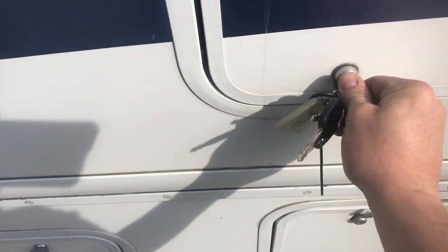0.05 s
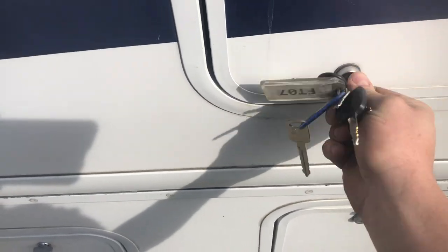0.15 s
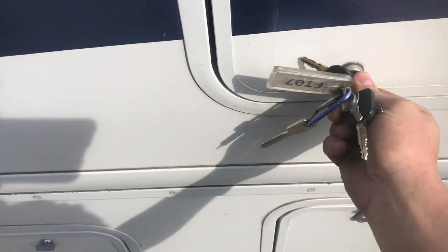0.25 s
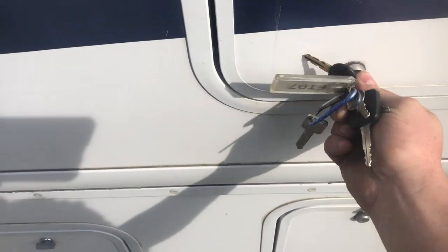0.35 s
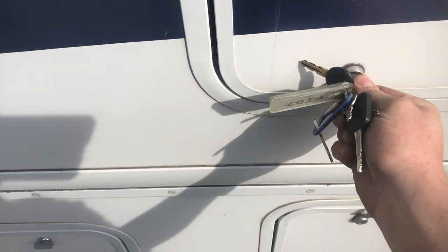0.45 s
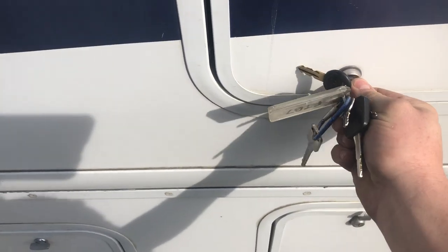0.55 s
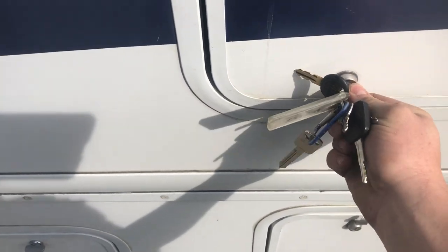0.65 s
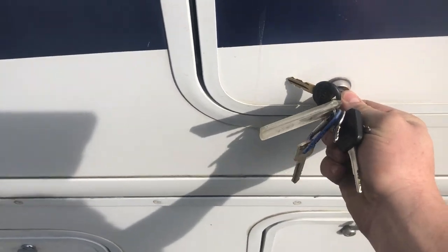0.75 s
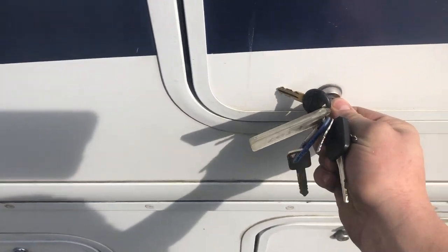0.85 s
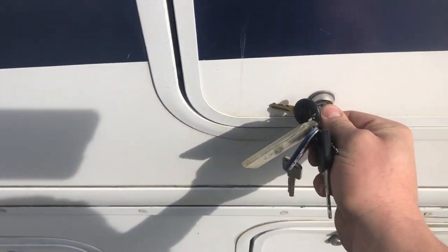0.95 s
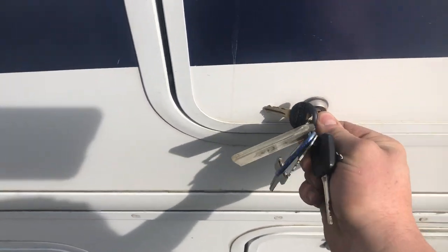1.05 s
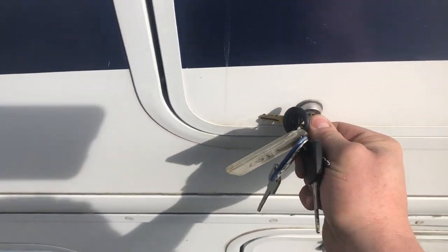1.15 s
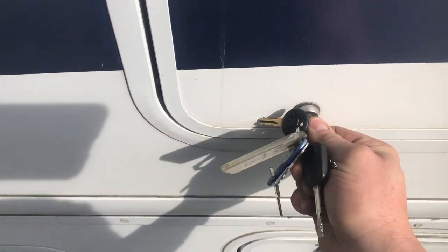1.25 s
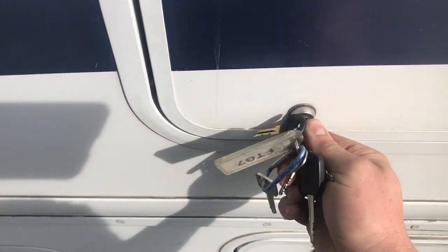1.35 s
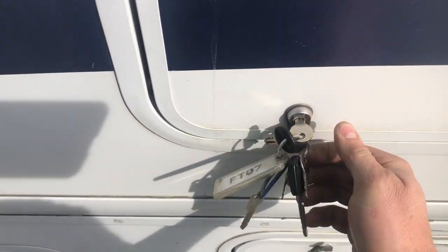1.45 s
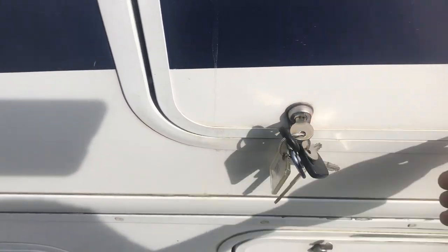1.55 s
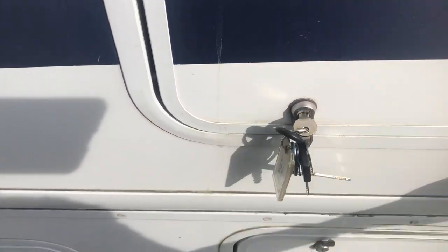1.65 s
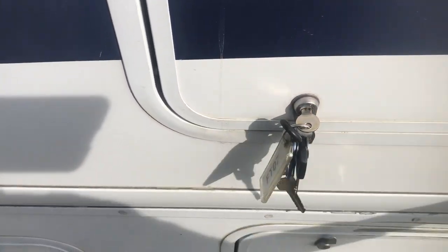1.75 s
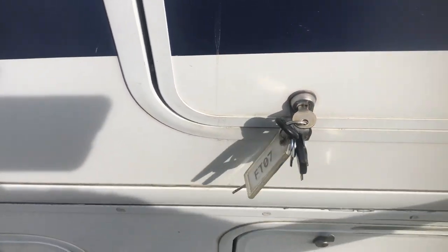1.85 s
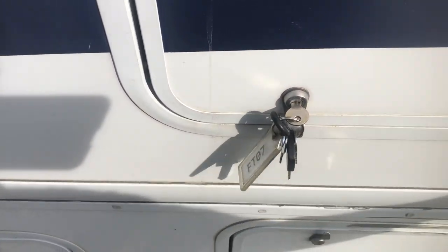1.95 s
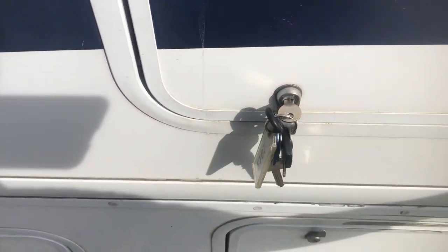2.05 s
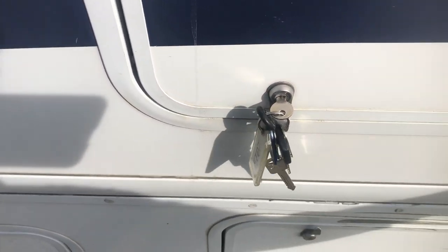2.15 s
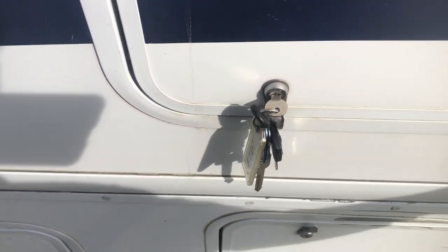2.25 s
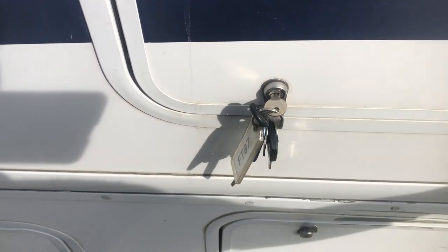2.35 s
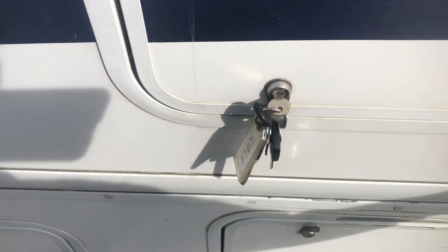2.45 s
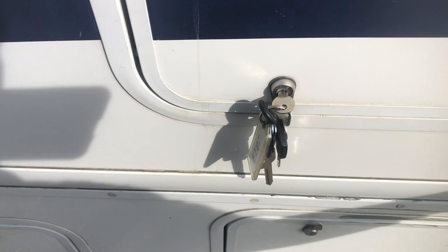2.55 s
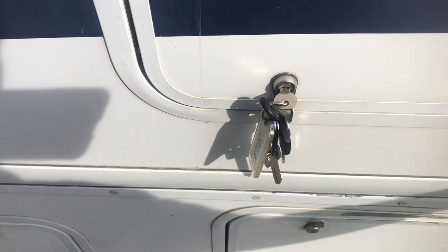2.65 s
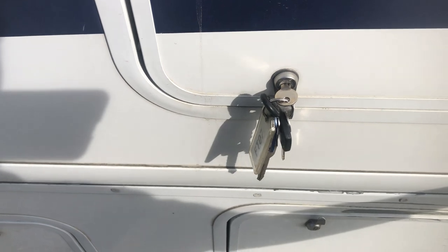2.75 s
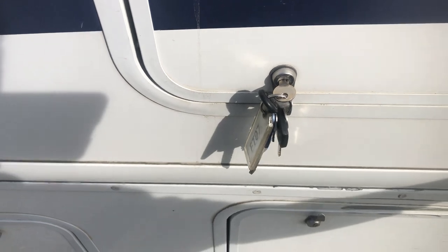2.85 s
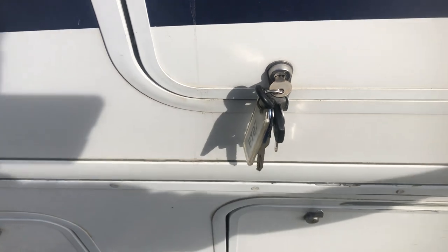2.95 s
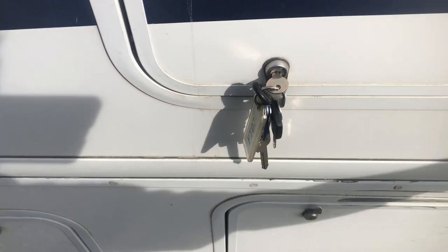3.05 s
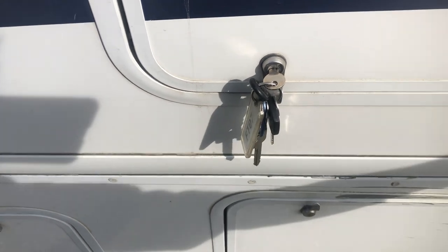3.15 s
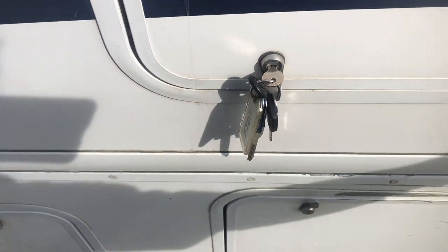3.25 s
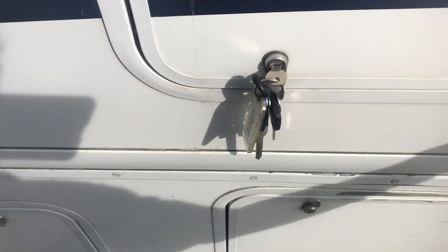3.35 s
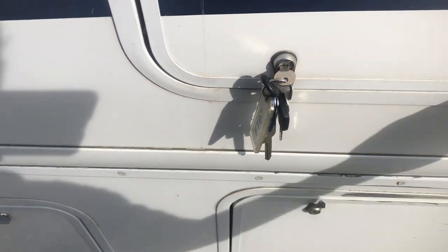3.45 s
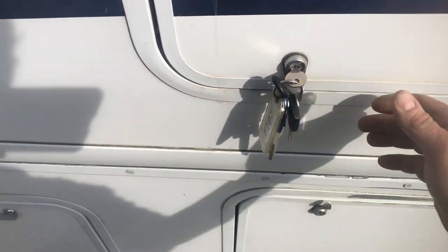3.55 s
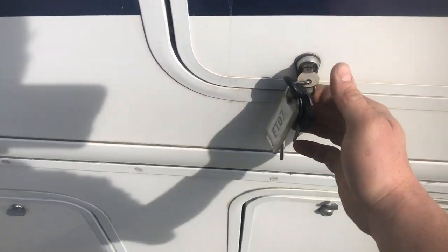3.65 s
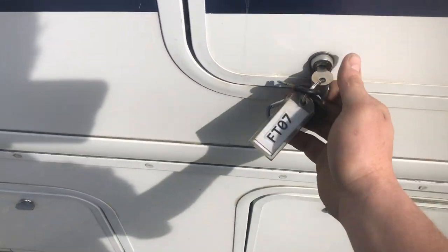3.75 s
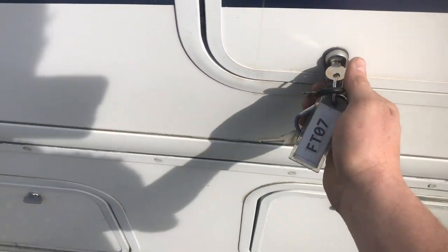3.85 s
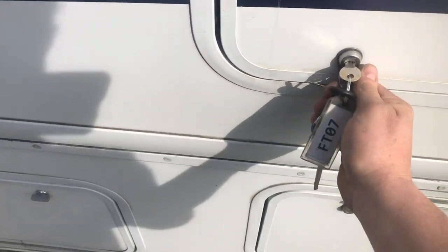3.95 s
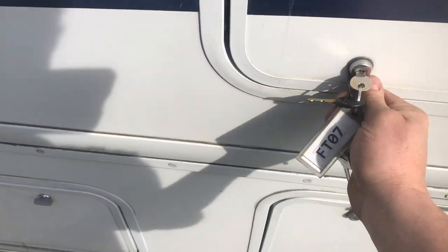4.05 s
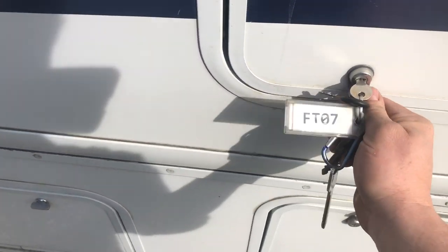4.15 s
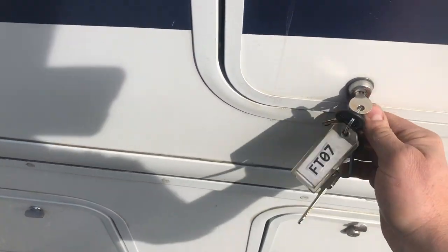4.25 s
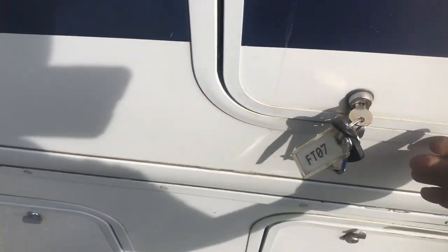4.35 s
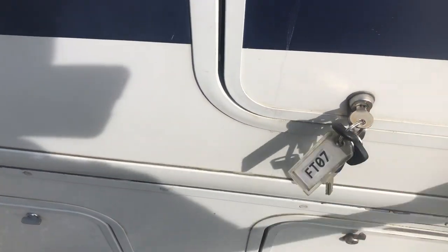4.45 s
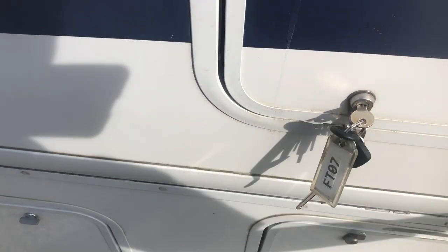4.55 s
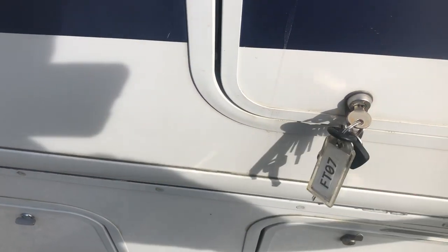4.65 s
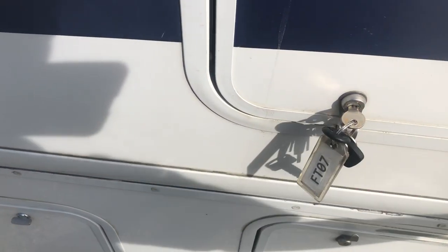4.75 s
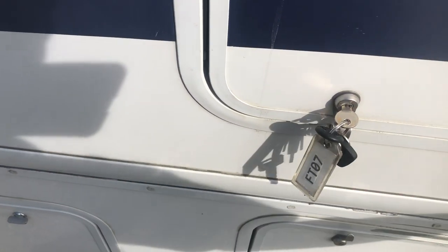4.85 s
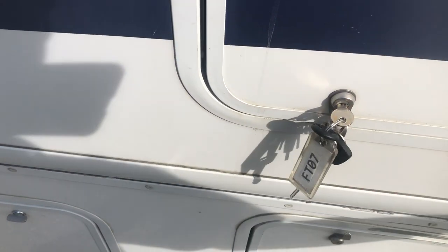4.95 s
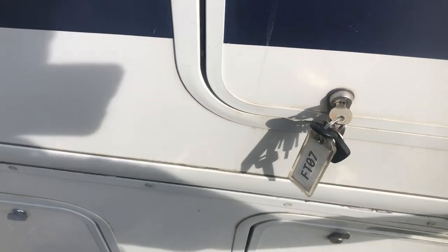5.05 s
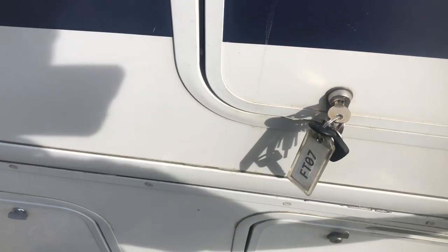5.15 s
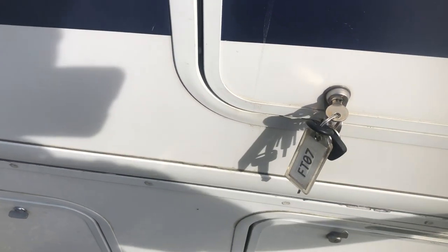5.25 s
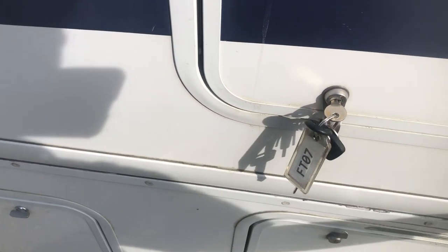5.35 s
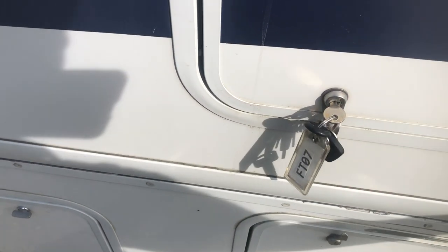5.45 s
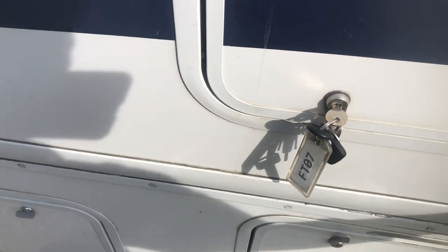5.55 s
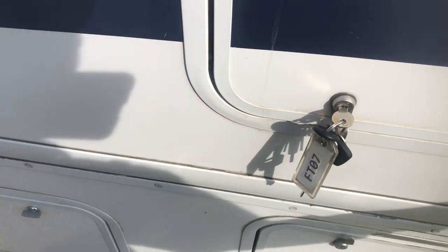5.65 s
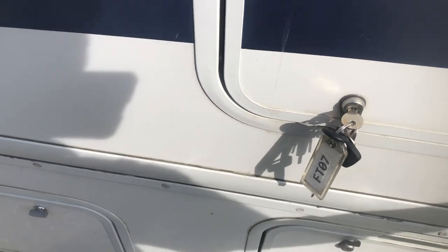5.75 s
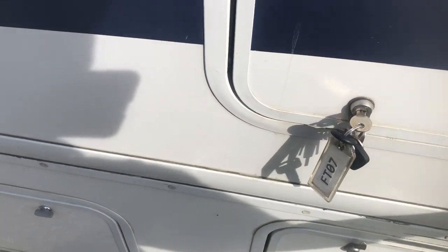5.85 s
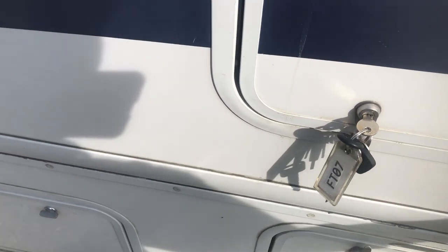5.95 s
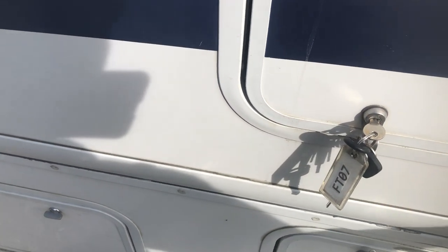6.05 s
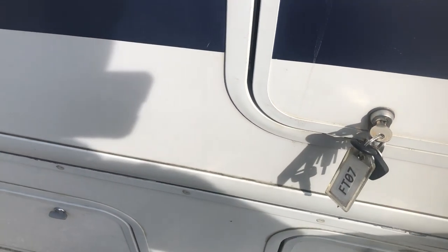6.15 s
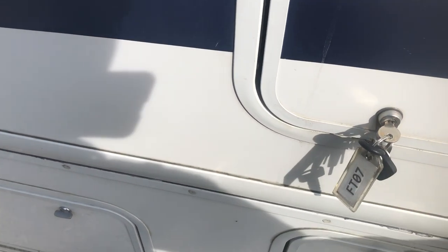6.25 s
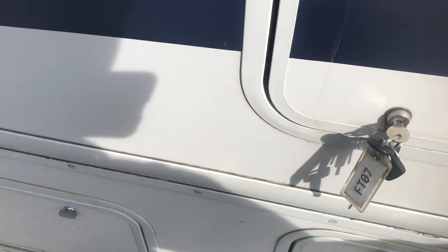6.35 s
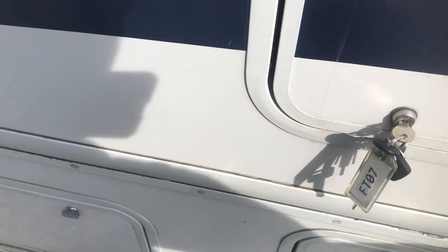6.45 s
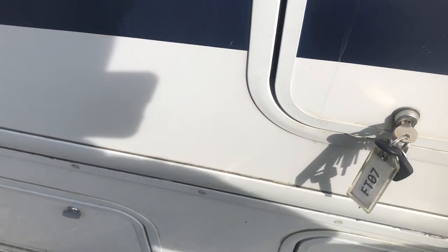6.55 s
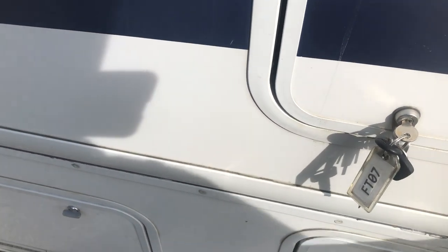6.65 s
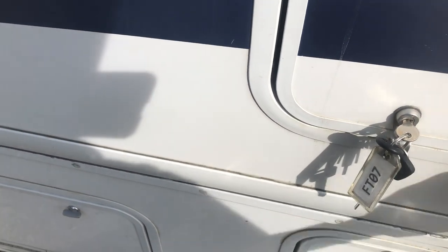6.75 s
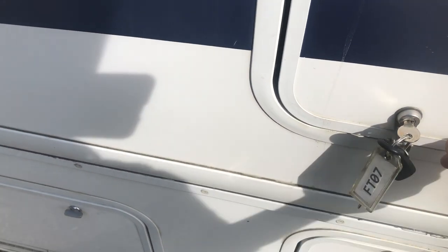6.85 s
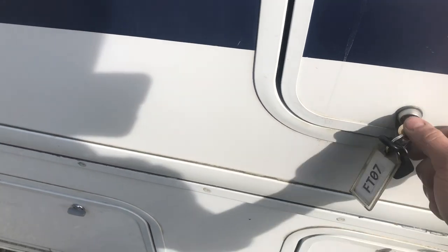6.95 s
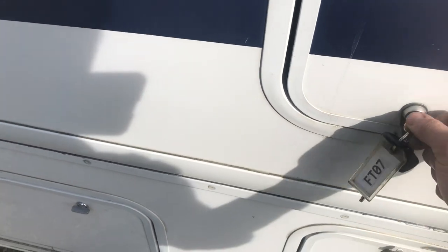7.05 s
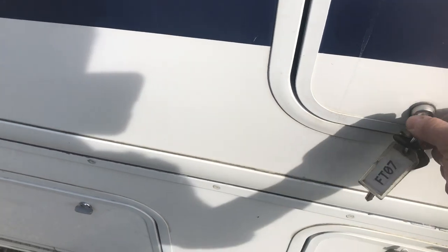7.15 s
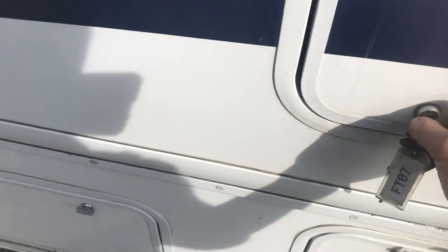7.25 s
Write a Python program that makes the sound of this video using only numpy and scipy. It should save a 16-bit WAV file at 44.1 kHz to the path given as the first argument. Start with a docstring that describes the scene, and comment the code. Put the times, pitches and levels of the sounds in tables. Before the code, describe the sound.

Keys rattle in short bursts against a light hollow door, with sharp metal snaps, knocks, brief scrapes and quiet traffic noise behind.

```python
"""A bunch of keys is worked in the lock of a thin compartment door, outdoors, over traffic wash and hiss.
Keys click and knock for half a second, touch lightly, then burst into clatter at 1.4-1.9 s: metal snaps,
key modes ring, the struck door skin knocks and the whole panel booms. A hard knock at 2.45 s leads into
faint slides; dense jingling and ringing at 3.7-4.8 s; a blow at 5.06 s, then slides scrape, made of
filtered grains of noise. A last light clicking and knocking comes at 6.9-7.3 s."""
import sys
import numpy as np
from scipy import signal
from scipy.fft import rfft, irfft, next_fast_len
from scipy.io import wavfile
from scipy.ndimage import uniform_filter1d

SR = 44100
rng = np.random.default_rng(int(sys.argv[2]) if len(sys.argv) > 2 else 0)


def to_wav(sig):
    """Store sig (one row per channel, or 1-D mono) as 16-bit WAV at the path in sys.argv[1].

    Samples outside -1..1 are clipped; the rate is SR.
    """
    pcm = np.clip(np.atleast_2d(sig), -1, 1) * 32767
    pcm = np.round(pcm).astype(np.int16)
    wavfile.write(sys.argv[1], SR, pcm.T)  # frames by channels


N = 322371


def gain_of(db):
    """dB to gain."""
    return 10 ** (np.asarray(db) / 20)


def evened(x):
    """Sets rms 1."""
    return x / np.sqrt(np.mean(x ** 2) + 1e-20)


def smoothed_twice(x, first, second, axis=-1):
    """Two running means, lengths in samples."""
    return uniform_filter1d(uniform_filter1d(x, size=first, axis=axis), size=second, axis=axis)


def read(points, hz):
    """Reads a spectrum in dB on a log-frequency axis."""
    point_hz, db = np.transpose(points)
    return np.interp(np.log(hz + 1), np.log(point_hz + 1), db)


def add(mix, start_s, sound):
    """Mixes a sound in at start_s, in place."""
    part = mix[round(start_s * SR):][:len(sound)]
    part += sound[:len(part)]


def coloured(x, db_at):
    """Filters by a spectrum in dB, a function of Hz, and sets rms 1."""
    hz = np.fft.rfftfreq(len(x), 1 / SR)
    return evened(irfft(rfft(x) * gain_of(db_at(hz)), len(x)))


# Smooth treble spectrum. Each row: frequency in Hz, relative density in dB per Hz.
HISS_SPECTRUM = [(1470, -34.5), (2500, -16), (3040, -10), (3440, -11.5), (4550, -12), (5190, -17),
                 (16000, -22.5)]
HISS_RMS_DB = -76.5


def hiss():
    """Smooth steady hiss in the treble."""
    return gain_of(HISS_RMS_DB) * coloured(rng.standard_normal(N), lambda hz: read(HISS_SPECTRUM, hz))


# Distant traffic spectrum. Each row: frequency in Hz, relative density in dB per Hz.
WASH_SPECTRUM = [(24, -36), (40, 2), (81, -12), (118, -0.5), (147, -4), (493, -20), (802, -8), (944, -11.5),
                 (1030, -6.5), (1190, -14.5), (1310, -11.5), (2290, -24.5), (3000, -43.5), (3900, -70),
                 (6600, -120)]
# Distant traffic swells. Each row: time in seconds, level in dB.
WASH_SWELLS = [(0.0, -51), (0.65, -49.5), (1.44, -48.5), (1.67, -52), (1.97, -47.5), (3.54, -54),
               (3.7, -54.5), (3.87, -53), (4.3, -53), (4.56, -54), (6.31, -51.5), (6.43, -49.5),
               (6.78, -52.5), (7.31, -53.5)]


def wash():
    """Traffic: random short-time spectra with drifting patches; the bass is lumpy with wind."""
    frames, hz = N // 256 + 5, np.fft.rfftfreq(1024, 1 / SR)[:, None]
    real, imag, patches = rng.standard_normal((frames, 513, 3)).T
    patches = uniform_filter1d(uniform_filter1d(patches, size=10, axis=0), size=14, axis=1)
    gusts = evened(uniform_filter1d(rng.standard_normal(frames), size=8))
    gust_db = 2.0 * gusts / (1 + (hz / 300) ** 2)
    frame_db = read(WASH_SPECTRUM, hz) + 2.3 * evened(patches) + gust_db
    spectra = (real + 1j * imag) * gain_of(frame_db)
    noise = evened(signal.istft(spectra, nperseg=1024, noverlap=768)[1][:N])
    swell_s, swell_db = np.transpose(WASH_SWELLS)
    return gain_of(np.interp(np.arange(N) / SR, swell_s, swell_db)) * noise


def grains(per_s, spread_db, tail_s):
    """Noise in many small bursts of uneven size, over a faint steady floor."""
    size = gain_of(spread_db * np.minimum(rng.exponential(1, N), 4))
    size = size * (rng.random(N) < per_s / SR)
    bursts = signal.lfilter([1], [1, -np.exp(-1 / (tail_s * SR))], size)
    return rng.standard_normal(N) * (bursts + 0.062)


def patchy(x, patchy_db):
    """The colour keeps changing in patches of about 900 Hz by 25 ms; sets rms 1."""
    spectra = signal.stft(x, nperseg=256, noverlap=192)[2]
    patches = uniform_filter1d(rng.standard_normal(spectra.shape), size=5, axis=0)
    patches = evened(uniform_filter1d(patches, size=18, axis=1))
    return evened(signal.istft(spectra * gain_of(patchy_db * patches), nperseg=256, noverlap=192)[1][:N])


# Broad chatter of the bunch. Each row: frequency in Hz, relative level in dB.
JINGLE_SPECTRUM = [(2500, -33.5), (3500, -10), (4500, -30.5), (6000, -6.5), (8000, -1), (11000, -0.5),
                   (14000, -2.5), (15800, -25.5)]


def jingle_db(hz):
    """Broad chatter with the key modes standing out."""
    peaks = sum(gain_of(13) / (1 + ((hz - mode_hz) / 30) ** 2) for mode_hz in KEY_MODES_HZ)
    return read(JINGLE_SPECTRUM, hz) + 10 * np.log10(1 + peaks)


# Edges of metal on paint. Each row: frequency in Hz, relative level in dB.
GRIT_SPECTRUM = [(1800, -24), (2500, 7), (3000, -5.5), (3700, 3), (4500, 4), (5500, -5.5), (8000, -22.5),
                 (16000, -36)]
# Door skin under a rub. Each row: frequency in Hz, relative density in dB per Hz.
SCRAPE_SPECTRUM = [(350, -40), (600, -3), (641, -8.5), (736, -3.5), (1290, -5), (1410, -2.5), (1910, -1),
                   (2590, -16), (2900, -21), (3770, -48), (6380, -120)]
# Whole panel under a rub. Each row: frequency in Hz, relative density in dB per Hz.
RUMBLE_SPECTRUM = [(29, -45.5), (50, -21), (130, 1), (376, -2.5), (471, -3), (590, -21.5), (650, -17.5),
                   (840, -44), (1430, -120)]
# Fine even friction of a slide. Each row: frequency in Hz, relative density in dB per Hz.
RASP_SPECTRUM = [(1410, -38), (2400, -43), (2500, -5.5), (3860, 0.5), (5840, -17.5), (9480, -19.5),
                 (10300, -15.5), (13400, -23), (14800, -21), (16000, -28)]
# One curve for each handling of the bunch.
# Each row of a curve: time in seconds, shaking level in dB, level of rubbing on the door in dB.
HANDLING_CURVES = [
    [(0, -38, -39.5), (.03, -45, -45.5), (.045, -57, -48), (.115, -58, -46.5), (.14, -71, -56),
     (.18, -63, -52), (.2, -61, -35.5), (.25, -55, -55), (.27, -78, -60), (.285, -51, -46),
     (.325, -56, -45), (.345, -78, -59), (.44, -77, -55), (.46, -67, -45), (.51, -91, -61.5),
     (.9, -75, -58.5)],
    [(.9, -63, -53.5), (1.03, -65, -50.5), (1.05, -73, -55), (1.2, -72, -61.5), (1.3, -81, -57),
     (1.32, -51, -48), (1.345, -64, -65)],
    [(1.378, -60, -60), (1.42, -58, -54.5), (1.44, -45, -47), (1.51, -42.5, -39), (1.54, -36, -34),
     (1.585, -34.5, -31), (1.61, -49.5, -38.5), (1.675, -42.5, -41.5), (1.72, -51, -48.5),
     (1.735, -66, -50.5), (1.755, -43.5, -41), (1.79, -64, -46.5), (1.825, -79, -59), (1.84, -68, -39.5),
     (1.87, -55, -40), (1.92, -56, -58), (1.94, -71, -46)],
    [(2.4, -80, -62), (2.44, -79, -47.5), (2.5, -73, -65.5)],
    [(3.643, -73, -52), (3.68, -78, -65), (3.695, -60, -35.5), (3.75, -43.5, -53.5), (3.765, -63, -60.5),
     (3.8, -64, -55), (3.84, -58, -57), (3.86, -46, -57.5), (3.9, -64, -50), (3.99, -68, -57)],
    [(4, -64, -35.5), (4.03, -73, -62), (4.045, -50, -48.5), (4.07, -75, -55), (4.11, -59, -58),
     (4.14, -62, -37), (4.175, -66, -53), (4.21, -68, -52.5), (4.27, -51.5, -52), (4.285, -36.5, -43.5),
     (4.34, -40.5, -49), (4.352, -28, -32.5), (4.375, -49, -39.5), (4.41, -54, -39), (4.425, -35, -39),
     (4.45, -38, -36), (4.485, -66.5, -51), (4.6, -63, -64), (4.62, -77, -65.5)],
    [(4.7, -100, -50), (4.735, -86, -54), (4.77, -73, -59), (4.82, -85, -64.5), (4.92, -88, -58.5),
     (4.93, -75, -71), (5.07, -71, -55)],
    [(6.947, -85, -49.5), (7.02, -71, -54), (7.035, -62, -43), (7.13, -64, -54.5), (7.15, -91, -59),
     (7.185, -80, -61), (7.195, -85, -44), (7.215, -65, -45), (7.245, -90, -60), (7.31, -72, -55.5)],
]
# A key or the tag slides over the paint. Each row: start in seconds, length in seconds before it lets go,
# scrape level in dB, rasp level in dB, rumble level in dB.
SLIDES_ON_PAINT = [(2.783, .07, -56, -74, -47), (3.116, .096, -58, -65.5, -71),
                   (3.212, .078, -52.5, -73, -59.5), (5.278, 0.099, -56.5, -68.5, -61.5),
                   (5.492, 0.057, -57, -69.5, -52), (5.612, 0.066, -51, -53.5, -55.5),
                   (6.167, 0.024, -68, -73, -66), (6.434, 0.058, -61, -67, -51),
                   (5.665, 0.0863, -40, -50.5, -42.5), (6.292, .118, -41.5, -47.5, -43.5)]
GRIT_RE_SHAKE_DB, GRIT_RE_RUB_DB = -3, -15.5
# the heavy panel gains only part of each dB by which the rubbing exceeds a firm rub
FIRM_RUB_DB, RUMBLE_RE_FIRM_RUB_DB, RUMBLE_DB_PER_RUB_DB = -48.5, -1, 0.71
RATTLE_RE_KNOCK_DB, RATTLE_T60_S = -26, 0.1
SLIDE_RISE_S, SLIDE_SAG_DB, SLIDE_T60_S = 0.01, 2, 0.051


def rustles():
    """Small contacts crowd together: shaking jingles the bunch, rubbing scrapes and rumbles on the door."""
    t = np.arange(N) / SR
    shake, rub = np.zeros((2, N))
    for curve in HANDLING_CURVES:
        curve_s, shake_db, rub_db = np.transpose(curve)
        shake += gain_of(np.interp(t, curve_s, shake_db, -120, -120))
        rub += gain_of(np.interp(t, curve_s, rub_db, -120, -120))
    # after a knock the loose key drags on for a moment
    for start_s, knock_db, *_ in DOOR_KNOCKS:
        add(rub, start_s, gain_of(knock_db + RATTLE_RE_KNOCK_DB - 60 * t[:9000] / RATTLE_T60_S))
    bend = (rub / gain_of(FIRM_RUB_DB)) ** RUMBLE_DB_PER_RUB_DB
    bend = bend * gain_of(RUMBLE_RE_FIRM_RUB_DB + FIRM_RUB_DB)
    edges = np.hypot(gain_of(GRIT_RE_SHAKE_DB) * shake, gain_of(GRIT_RE_RUB_DB) * rub)
    levels = np.array([shake, edges, rub, bend, np.zeros(N)])

    # a slide bites quickly, slows down and lets go
    for start_s, length_s, scrape_db, rasp_db, rumble_db in SLIDES_ON_PAINT:
        u = t[:round(length_s * SR) + 4000]
        sag_db = SLIDE_SAG_DB * np.minimum(u / length_s, 1)
        release_db = 60 * np.maximum(u - length_s, 0) / SLIDE_T60_S
        rise = np.minimum(u / SLIDE_RISE_S, 1)
        for level, db in zip(levels[2:], [scrape_db, rumble_db, rasp_db]):
            add(level, start_s, rise * gain_of(db - sag_db - release_db))

    jingle = patchy(coloured(grains(440, 1.0, 0.002), jingle_db), 2.9)
    grit = patchy(coloured(grains(1200, 2.0, 0.0018), lambda hz: read(GRIT_SPECTRUM, hz)), 4.0)
    scrape = patchy(coloured(grains(400, 0.83, 0.0032), lambda hz: read(SCRAPE_SPECTRUM, hz)), 2.9)
    rumble = coloured(grains(210, 1.3, 0.0071), lambda hz: read(RUMBLE_SPECTRUM, hz))
    rasp = patchy(coloured(grains(1600, 1.7, 0.0019), lambda hz: read(RASP_SPECTRUM, hz)), 1.5)
    return (uniform_filter1d(levels, size=130) * [jingle, grit, scrape, rumble, rasp]).sum(0)


def struck(modes, centre_hz, reach_octaves, push, t60_s):
    """A push rings the modes, most those near centre_hz, as the place of the blow chooses. Peak 1."""
    f, width_hz, db = np.transpose(modes)[:, :, None]
    # bending waves are slower the lower they are, so the low modes come in late
    late_s = .15 * np.maximum(f ** -.5 - centre_hz ** -.5, 0)
    t = np.maximum(np.arange(6000) / SR - late_s, 0)
    db = db - 6 * (np.log2(f / centre_hz) / reach_octaves) ** 2
    ring = gain_of(db - 92 * width_hz * t) * np.sin(2 * np.pi * f * t)
    # weaker waves keep coming back from the rim of the door, their phase wandering
    wander = np.cumsum(rng.standard_normal((len(modes), 6000)), axis=1) * np.sqrt(width_hz / SR) * .4
    back = np.sin(2 * np.pi * (f * t + rng.random(f.shape) + wander)) * np.minimum(t * f / 3, 1)
    back = gain_of(db - 8.5 - 60 * t / t60_s) * back
    sound = signal.fftconvolve((ring + back).sum(0), push)
    return sound / abs(sound).max()


# The whole panel bends. Each row: time of the blow in seconds, peak in dB, centre of the woken modes in Hz.
PANEL_BOOMS = [(0.143, -26, 274), (0.188, -28, 355), (0.308, -39, 409), (0.409, -29.5, 270),
               (0.473, -27, 140), (1.479, -28, 188), (1.53, -15, 390), (1.643, -39, 373), (1.749, -31, 384),
               (1.837, -29, 217), (2.458, -34.5, 294), (2.674, -36, 196), (2.789, -36.5, 196),
               (3.647, -34, 350), (3.695, -36, 270), (3.834, -34, 136), (4.006, -25.5, 156),
               (4.129, -33, 168), (4.285, -38.5, 194), (4.344, -31.5, 465), (4.579, -38.5, 486),
               (4.703, -33.5, 229), (4.827, -38.5, 202), (4.967, -34.5, 283), (5.062, -35.5, 256),
               (5.352, -38.5, 363), (5.389, -35, 232), (5.442, -42, 440), (5.692, -24, 261),
               (6.304, -34, 290), (6.463, -26.5, 210), (6.574, -41, 231), (6.955, -39.5, 361),
               (7.031, -33, 126), (7.082, -39, 177)]
# Panel modes. Each row: frequency in Hz, width in Hz (direct ring falls 92 dB/s per Hz), level in dB.
PANEL_MODES = [(75, 40, -11), (123, 39, -9), (197.4, 28, -9), (259, 130, 8), (290, 70, 14.5),
               (388.2, 26, 19), (505, 360, 26)]
BOOM_LAG_S, PANEL_T60_S = 0.004, 0.12


def booms():
    """A soft push, about a cycle long, bends the whole panel, which answers a little late."""
    out, t = np.zeros(N), np.arange(600) / SR
    for blow_s, db, hz in PANEL_BOOMS:
        push = np.cos(2 * np.pi * hz * t) * np.sin(np.pi * np.minimum(t * hz / 1.2, 1))
        add(out, blow_s + BOOM_LAG_S, gain_of(db) * struck(PANEL_MODES, hz, 0.38, push, PANEL_T60_S))
    return out


# Key or tag on the door. Each row: start in seconds, skin peak in dB before the high-pass,
# centre of the woken modes in Hz, hardness as crack peak over skin peak in dB.
DOOR_KNOCKS = [(0.1458, -20, 1760, -22), (0.194, -26, 1670, -22), (.277, -13, 1120, -16.5),
               (.308, -26.5, 1070, -26), (.411, -36, 2150, -22), (0.444, -24.5, 1040, -19),
               (0.564, -39, 1040, -31), (0.938, -30, 1060, -22), (.983, -30.5, 1210, -9),
               (1.205, -33.5, 1550, -18), (1.385, -40, 2310, -15), (1.425, -27, 2410, -20),
               (1.534, -8.5, 1530, -11), (1.608, -21.5, 1880, -24), (1.71, -31, 1900, -21),
               (1.752, -26.5, 1650, -6), (1.842, -16, 1580, -31), (1.911, -33, 2260, -9),
               (1.928, -20.5, 1800, -22), (2.067, -34, 1910, -19), (2.347, -42, 1270, -3),
               (2.4477, -9, 2194, 1), (3.266, -36.5, 1640, -30), (3.377, -43, 1680, -27),
               (3.692, -28, 2070, -9), (3.747, -35, 2120, -9), (3.81, -38, 2040, -12),
               (3.834, -29, 2160, -19), (3.851, -24.5, 1530, -6), (3.877, -23.5, 2320, -10),
               (4.0, -24, 1725, -4.5), (4.054, -37, 1830, -2.5), (4.097, -39, 1720, -12),
               (4.132, -27.5, 2150, 2.5), (4.206, -34, 870, -22), (4.255, -36.5, 2100, -5),
               (4.288, -25.5, 2390, -1), (4.346, -14.5, 2120, -26), (4.352, -12.5, 2330, -13),
               (4.413, -21.5, 1280, 0.5), (4.545, -24, 2380, -1), (4.581, -28.5, 2070, -6),
               (4.703, -32.5, 1750, -36), (4.729, -24.5, 1790, -43), (4.759, -36.5, 2050, -17),
               (4.829, -29, 1800, -32), (4.926, -34, 2430, -12), (4.952, -46, 1260, -18),
               (4.968, -22, 1510, -17.5), (5.0639, -10.5, 1814, -10), (5.39, -29, 1890, -35),
               (5.44, -39, 1830, -20), (5.616, -44.5, 1500, 12), (5.709, -22.5, 1430, -27),
               (6.267, -42, 830, -22), (6.311, -31, 1477, -11.5), (6.391, -32, 1780, 1),
               (6.462, -21.5, 1660, -36), (6.949, -39, 2010, -26), (7.032, -32, 2100, -19),
               (7.081, -32, 1430, -2.5), (7.198, -40, 1940, -9), (7.303, -35, 1800, -13)]
# Door skin modes. Each row: frequency in Hz, width in Hz (direct ring falls 92 dB/s per Hz), level in dB.
DOOR_MODES = [(832.4, 83, 5), (1091, 350, 3), (1424, 380, 3), (1776, 180, 6.5), (2191, 730, 4.5),
              (2450, 350, -1)]
# Lock modes, woken by a hard edge. Each row: frequency in Hz, width in Hz (as above), level in dB.
LOCK_MODES = [(2920, 500, 1), (3170, 1200, -0.5), (3920, 770, -6), (4130, 500, -5), (5200, 900, -17.5)]
FULL_SCALE_CONTACT_S = 0.00076  # softer blows stay longer
DOOR_T60_S, DOOR_REACH_OCTAVES = 0.028, 0.75


def knocks():
    """A contact of a millisecond or two drives the door skin; its hard edge cracks in the lock."""
    out, t = np.zeros(N), np.arange(400) / SR
    for start_s, db, hz, hard_db in DOOR_KNOCKS:
        contact_s = FULL_SCALE_CONTACT_S * gain_of(-db / 5)
        touch = abs(np.sin(np.pi * np.minimum(t / contact_s, 1)))
        skin_rough, edge_rough = rng.standard_normal((2, 400))
        push = touch * (np.cos(2 * np.pi * hz * t) + 1.4 * smoothed_twice(skin_rough, 7, 7))
        edge = touch * (edge_rough + 1.6 * np.cos(2 * np.pi * 3800 * t))
        skin = struck(DOOR_MODES, hz, DOOR_REACH_OCTAVES, push, DOOR_T60_S)
        crack = struck(LOCK_MODES, 3800, 1.5, edge, 0.4 * DOOR_T60_S)
        add(out, start_s, gain_of(db) * (skin + gain_of(hard_db) * crack))
    # the knocks keep out of the bass
    return signal.sosfilt(signal.butter(3, 550, "high", fs=SR, output="sos"), out)


# Free vibrations of the keys and their rings, in Hz.
KEY_MODES_HZ = [4328, 5432, 5642, 7045, 8371, 9425, 12645, 13710, 14345, 15180, 15270, 15362]
# How fast each free mode dies, in dB/s, in the order of the modes.
KEY_FADING_DB_PER_S = [200, 60, 250, 300, 250, 120, 200, 300, 200, 150, 150, 120]
# A touch sets a key mode ringing until it is choked.
# Each row: start in seconds, mode number from 0, amplitude in dB before smoothing and swing, free time in seconds.
KEY_RINGS = [(0.102, 2, -59, 0.021), (0.102, 4, -49, 0.012), (0.319, 11, -50, 0.069),
             (0.329, 6, -59, 0.089), (1.13, 6, -70, .04), (1.456, 8, -24.5, .02), (1.459, 7, -35, .023),
             (1.462, 4, -36, 0.064), (1.474, 6, -31.5, 0.11), (1.497, 11, -38, .026),
             (1.522, 11, -33, 0.052), (1.591, 9, -38, 0.022), (1.599, 6, -43, .036), (1.638, 9, -42, 0.033),
             (1.641, 4, -33, .029), (1.646, 2, -35, 0.038), (1.645, 6, -34, 0.029), (1.671, 11, -41, .063),
             (1.759, 6, -37, .039), (1.773, 4, -40.5, 0.03), (1.775, 11, -47, 0.046),
             (1.803, 6, -32, 0.054), (1.881, 9, -56, 0.027), (2.131, 6, -46, 0.016), (2.133, 4, -66, 0.024),
             (2.141, 5, -63, 0.064), (2.214, 5, -70, .17), (3.755, 5, -58, 0.034), (3.76, 11, -62, .055),
             (3.88, 7, -54, 0.031), (3.947, 4, -55, .028), (4.127, 11, -49, 0.044),
             (4.136, 2, -41.5, 0.026), (4.142, 4, -54, 0.014), (4.148, 9, -54, 0.048),
             (4.155, 6, -56, 0.025), (4.156, 11, -50, 0.12), (4.205, 6, -34.5, 0.019),
             (4.297, 6, -29, 0.043), (4.297, 4, -31, 0.048), (4.3, 11, -37, .06), (4.304, 5, -40, .029),
             (4.412, 2, -26.5, 0.085), (4.411, 6, -25.5, 0.064), (4.414, 4, -28.5, 0.077),
             (4.418, 0, -25.5, 0.045), (4.419, 11, -25.5, 0.056), (4.42, 5, -34.5, 0.061),
             (4.421, 1, -44, 0.1), (4.426, 8, -29, .029), (4.428, 10, -37, .15), (4.447, 6, -20.5, 0.05),
             (4.452, 9, -46, .061), (4.483, 11, -28, 0.085), (4.582, 11, -45, 0.11), (4.736, 9, -55, .05),
             (4.741, 5, -47, 0.015), (7.037, 6, -44, 0.015), (7.038, 3, -48, 0.021), (7.2, 3, -55, 0.016)]
CHOKE_DB_PER_S, CHOKE_DEPTH_DB = 2000, 24


def rings():
    """Each mode is one oscillator; touches add amplitude that fades, drops when choked, rings on faintly."""
    t, after_s = np.arange(N) / SR, np.arange(12000) / SR
    size = np.zeros((len(KEY_MODES_HZ), N))
    for start_s, mode, db, free_s in KEY_RINGS:
        mode = int(round(mode))
        choke_db = np.clip(CHOKE_DB_PER_S * (after_s - free_s), 0, CHOKE_DEPTH_DB)
        add(size[mode], start_s, gain_of(db - KEY_FADING_DB_PER_S[mode] * after_s - choke_db))
    # a swinging key turns its face to and from the listener
    swing = evened(smoothed_twice(rng.standard_normal(size.shape), 500, 300))
    size = uniform_filter1d(size, size=60, axis=1) * gain_of(1.6 * swing)
    return sum(a * np.sin(2 * np.pi * (hz * t + rng.random())) for a, hz in zip(size, KEY_MODES_HZ))


# Key on key. Each row: start in seconds, peak in dB, brightness tilt in dB an octave,
# chatter against the snap in dB.
KEY_CLICKS = [(0.022, -25, 5, -14), (0.0512, -26, -13, -8), (0.0715, -37, -4, -23), (0.1018, -31, -11, -10),
              (0.1628, -37, -9, -13), (0.191, -31.5, -6, -5), (0.225, -34.5, -2, -10),
              (0.277, -27.5, -11, -18), (0.2884, -35, -4, -13), (0.3101, -28.5, -13, -5),
              (0.32, -26, -10, -16), (0.387, -48, -17, -13), (0.411, -37, -10, -15),
              (0.4419, -39.5, -16, -9), (0.4698, -44, -4, -4), (0.488, -44.5, -12, -7),
              (0.5447, -44, -23, -10), (0.626, -56, -4, -13), (0.8038, -38.5, -11, -11),
              (0.8535, -54, -2, -15), (0.9064, -55, -12, -13), (0.9493, -41, -4, -9), (0.981, -39, -4, -4),
              (1.0281, -44, -10, -15), (1.052, -41, 3, -13), (1.1326, -36.5, -3, -12),
              (1.2056, -44, -18, -6), (1.269, -52, -12, -13), (1.3242, -28.5, 3, -15),
              (1.3855, -41, -9, -13), (1.4, -40, -18, -3), (1.4254, -29, -6, -15), (1.455, -22, 5, -13),
              (1.5312, -10.5, -5, -11), (1.5485, -7.5, -5, -7), (1.644, -22, -1, -9),
              (1.6955, -36, -1, -13), (1.719, -27, -2, -5), (1.7432, -19.5, 0, -13), (1.7523, -17, 5, -9),
              (1.7764, -20, 5, -7), (1.8023, -34, 4, -22), (1.8637, -17, -1.5, -19), (1.9106, -32, -7, -16),
              (2.063, -34.5, -2, -8), (2.1326, -36, -3, 3), (2.2114, -46, 4, -14),
              (2.2952, -23, -16.5, -22), (2.3459, -29, -17, -16), (2.3744, -31.5, -15, -18),
              (2.3946, -40, -15, -13), (2.4473, -13, -7, -15), (2.5551, -47, -8, -5), (2.705, -50, -7, -9),
              (2.7816, -42.5, -14, -9), (2.8117, -36, -19, -19), (2.8283, -44.5, -18, -9),
              (3.0495, -58.5, -4, -12), (3.267, -46.5, -6, -13), (3.6949, -23, -1, -2), (3.701, -21, 1, -8),
              (3.737, -22.5, 0, 6), (3.8104, -30, 1, -3), (3.8325, -33, 1, -20), (3.8527, -19.5, -12, -21),
              (3.8775, -19, -4.5, -6), (3.9488, -31, -6, -8), (3.9674, -33, 3, -8),
              (4.001, -20.5, -9.5, -19), (4.0114, -26.5, -9, -17), (4.0397, -30, 8, -13),
              (4.0975, -27, -1, -16), (4.133, -17.5, -1, -5), (4.207, -31, -3, 1), (4.2547, -36, -19, -11),
              (4.2792, -26, -4, -10), (4.289, -18.5, -13.5, 4), (4.3462, -16, -4, -13),
              (4.3515, -20, -4, -13), (4.383, -34, -11, -21), (4.3899, -19.5, 1, -6), (4.4123, -14, 3, -13),
              (4.4447, -15, 3, -15), (4.545, -25.5, -10, -11), (4.582, -16, -1, -17), (4.641, -47, -32, 4),
              (4.7386, -24.5, 0, -9), (4.7873, -41.5, -12, -8), (4.9255, -33.5, -17, -15),
              (4.9523, -43, -14, -13), (5.272, -46.5, -23, -9.5), (5.2874, -53, -12, -9),
              (5.3185, -44, -19, -10), (6.9496, -47, -6, -17), (6.974, -38.5, -9, -13),
              (6.998, -33, 2, -19), (7.02, -56, -10, -16), (7.0355, -29.5, -3, -6), (7.0862, -27, -4, -17),
              (7.1152, -33, 3, -11), (7.1761, -58, -4, -13), (7.1924, -48, 5, -13), (7.199, -35, -15, -3),
              (7.234, -47, -12, -9)]
# Colour common to the clicks. Each row: frequency in Hz, level in dB.
CLICK_SPECTRUM = [(800, -120), (2500, -31.5), (4000, -11.5), (5000, -1), (7000, -5), (10000, -2),
                  (13000, 2.5), (14500, 3.5), (15800, -11)]
SNAP_T60_S, CHATTER_T60_S = 0.0057, 0.049


def clicks():
    """A sharp snap of noise, then a short spray of chatter as the metal settles."""
    out, t, hz = np.zeros(N), np.arange(4096) / SR, np.fft.rfftfreq(4096, 1 / SR)
    for start_s, db, tilt_db, chatter_db in KEY_CLICKS:
        fall = gain_of(-60 * t / SNAP_T60_S) + gain_of(chatter_db - 60 * t / CHATTER_T60_S)
        # the tilt levels off in the bass
        colour = gain_of(read(CLICK_SPECTRUM, hz) + tilt_db * np.log2(hz / 8000 + 0.12))
        sound = irfft(rfft(rng.standard_normal(4096)) * colour) * fall
        add(out, start_s, gain_of(db) * sound / abs(sound).max())
    return out


def scene():
    """All sources, one channel."""
    return (hiss() + wash() + rustles() + booms() + knocks() + rings() + clicks())[None]


# Microphone response. Each row: frequency in Hz, gain in dB.
MICROPHONE_RESPONSE = [(15, -37), (32, -26.5), (50, -8), (70, -1.5), (15600, -0.5), (16100, -17),
                       (17000, -16.5)]
BAND_LIMIT_HZ = 16800


def record(dry):
    """The microphone drops the deepest bass and the last treble; then the band limit."""
    size = next_fast_len(N + 8192)
    response = gain_of(read(MICROPHONE_RESPONSE, np.fft.rfftfreq(size, 1 / SR)))
    heard = irfft(rfft(dry, size) * response, size)[:, :N]
    low_pass = signal.firwin(511, BAND_LIMIT_HZ, window=("kaiser", 9), fs=SR)
    return signal.oaconvolve(heard, low_pass[None], "same")


dry = scene()
out = record(dry)
to_wav(out)
```